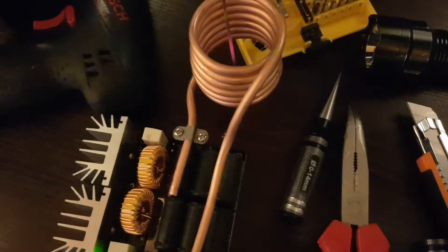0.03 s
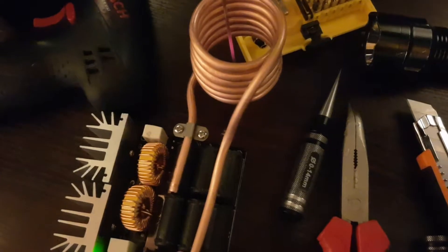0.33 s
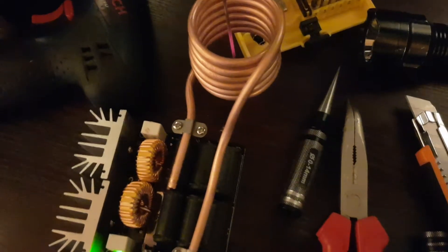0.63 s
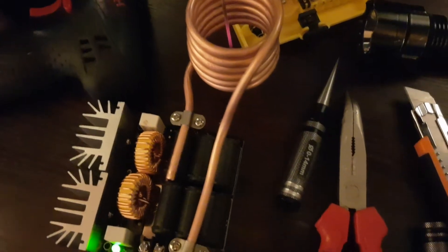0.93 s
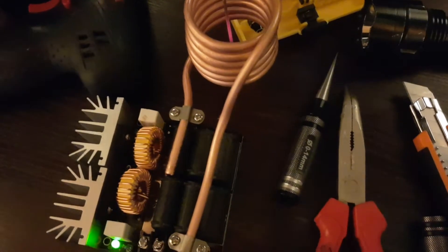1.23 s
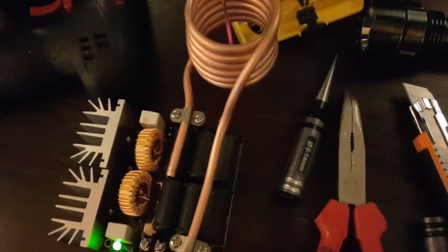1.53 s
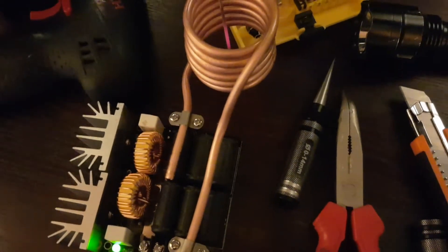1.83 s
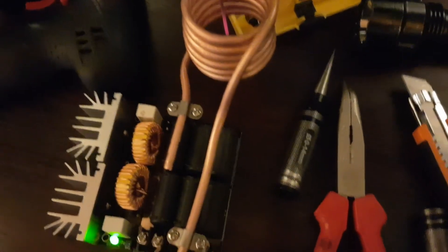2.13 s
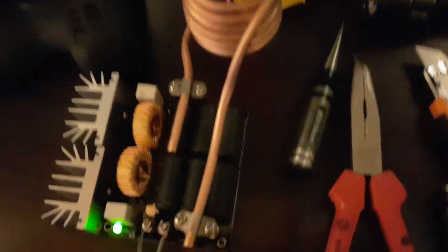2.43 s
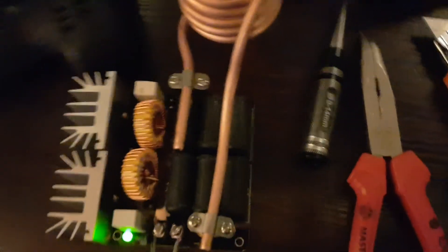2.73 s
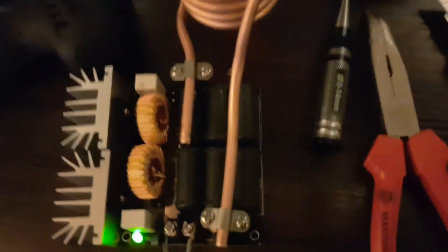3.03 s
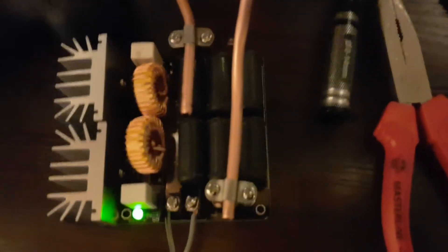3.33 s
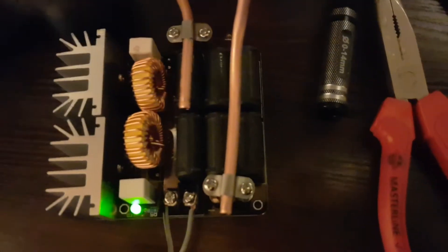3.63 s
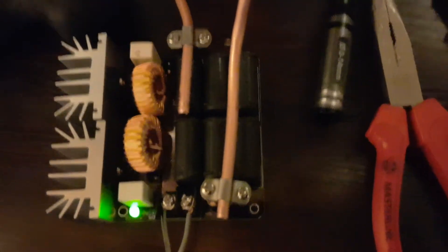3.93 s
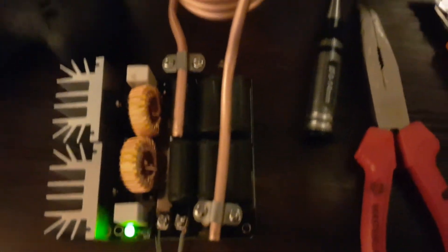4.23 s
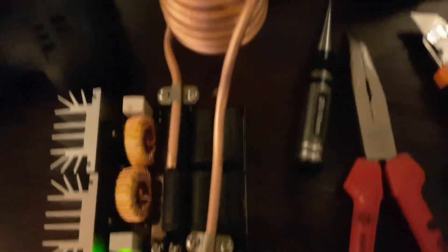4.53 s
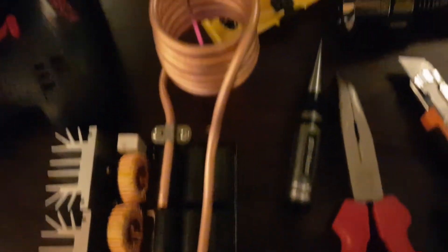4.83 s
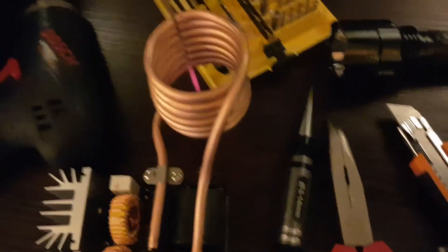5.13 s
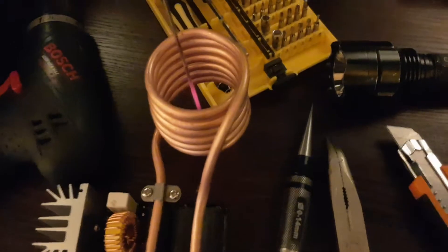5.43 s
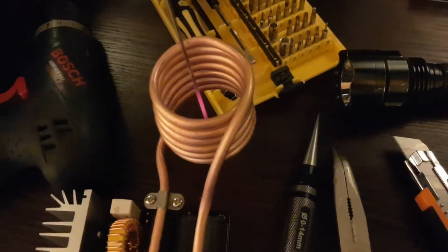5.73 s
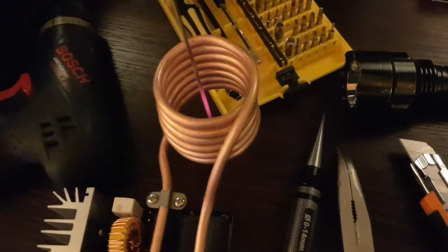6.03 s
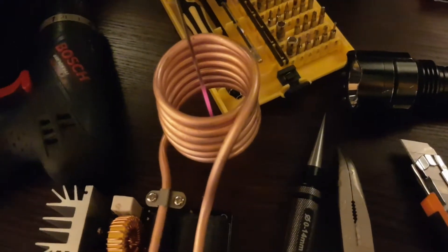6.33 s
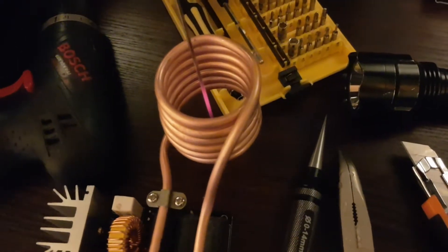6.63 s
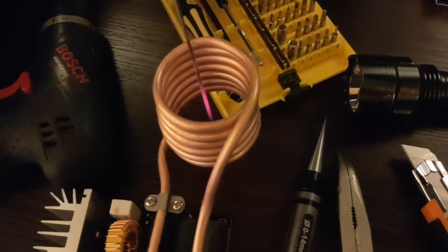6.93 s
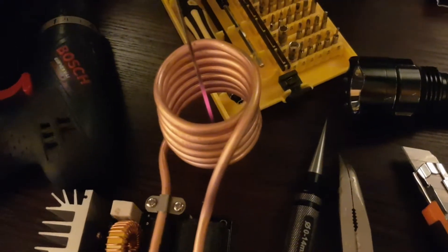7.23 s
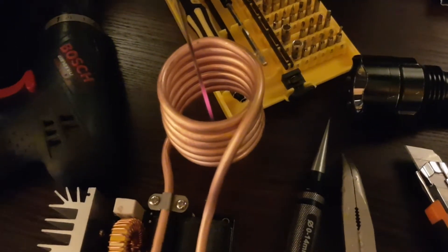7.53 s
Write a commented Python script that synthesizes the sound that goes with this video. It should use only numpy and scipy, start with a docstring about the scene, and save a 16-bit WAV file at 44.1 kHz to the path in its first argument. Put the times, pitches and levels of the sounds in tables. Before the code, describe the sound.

A small electronic device hums low and evenly in a quiet workshop while a hand softly bumps and rubs the camera.

```python
"""The power supply of a small induction heater hums at twice the mains frequency as its core flexes.
In the quiet workshop a hand shifts its grip on the camera: pushes thump through the casing,
stick-slip friction makes dull scuffs and light slides of skin, and the plastic gives tiny ticks.
Under it lie a faint clock, the murmur of the room and the hiss of the microphones."""
import sys
import numpy as np
from scipy import signal
from scipy.fft import rfft, irfft
from scipy.io import wavfile
from scipy.ndimage import uniform_filter1d

SR = 44100
rng = np.random.default_rng(int(sys.argv[2]) if len(sys.argv) > 2 else 0)


def bounce(signal):
    """Save signal as a 16-bit WAV file at the path given by the first command-line argument."""
    frames = np.transpose(np.atleast_2d(signal))
    limited = np.clip(frames, -1, 1)
    pcm = np.round(limited * 32767).astype(np.int16)
    wavfile.write(sys.argv[1], SR, pcm)


N = 343980
T = np.arange(N) / SR
HZ = np.fft.rfftfreq(N, 1 / SR)

# partials of the core: (harmonic number, relative level [dB])
HUM_PARTIALS = [(1, -0.5), (2, -23.5)]
# the camera nears the circuit and draws back: (time [s], gain [dB])
NEARNESS = [(2.0, -12), (2.8, 1.5), (4.2, -1.5), (5.0, -7), (7.8, -15)]
# shifts of the grip: (time [s], thump level [dB], thump frequency [Hz], rebound level [dB],
# scuff level [dB], scuff centre [Hz], jolt level [dB])
GRIP_SHIFTS = [(1.424, -49.5, 90.5, -53.5, -81, 179.5, -70), (1.692, -39, 96, -43.5, -67, 200, -54.5),
               (2.128, -46, 112, -64, -61, 290, -65), (2.349, -47, 94.5, -53, -76, 179, -62.5),
               (2.532, -53, 106, -60, -68, 210, -65), (2.73, -48.5, 108, -56, -57.5, 209, -66),
               (2.951, -26.5, 113.5, -46, -57, 225, -68), (3.226, -30.5, 105.6, -46, -55.5, 190, -58),
               (3.454, -48.5, 102, -46.5, -68, 180, -74), (3.694, -36.5, 103.7, -33, -59, 240, -44.5),
               (3.91, -43, 85, -43, -63, 150, -44.5), (4.215, -36, 116, -44.5, -62, 191, -53),
               (4.326, -49.5, 121, -74, -71, 394, -73), (4.472, -39.5, 109, -52, -64.5, 273, -50.5),
               (4.838, -51, 130, -49.5, -61, 320, -62), (5.24, -41.5, 112, -41.5, -51, 288, -49),
               (5.437, -51, 94, -59, -76, 200, -72), (5.745, -39, 111.6, -61, -69, 200, -67),
               (6.078, -52, 106, -70, -74, 180, -72), (6.607, -39, 116, -47.5, -59, 270, -69),
               (7.095, -42, 109, -51, -69.5, 180, -71), (7.628, -43, 122, -49, -61.5, 161, -55.5)]
# unsteadiness of the hand: (time [s], level [dB])
HAND_TREMOR = [(0, -90), (0.28, -65), (0.55, -83), (2.0, -69.5), (4.3, -68), (6.0, -73.5), (7.8, -79.5)]
# hard pushes: (time [s], knock level [dB], ring level [dB])
HARD_SHOVES = [(3.692, -45, -71.5), (4.815, -45.5, -69), (5.228, -50, -49)]
# skin and sleeve sliding: (time [s], level [dB], length [s], centre [Hz], spread [octaves])
SKIN_SLIDES = [(2.136, -74, 0.099, 4900, 0.57), (2.742, -73.5, 0.125, 4620, 1.4),
               (2.954, -70.5, 0.09, 3600, 1.7), (3.124, -80, 0.26, 8550, 0.39),
               (3.227, -67.5, 0.095, 2610, 1.6), (3.238, -69, 0.054, 3600, 0.12),
               (3.534, -74.5, 0.13, 4700, 1.4), (3.92, -68.5, 0.09, 3360, 1.4),
               (4.18, -77, 0.24, 3800, 2.1), (4.452, -67.5, 0.038, 3050, 0.35),
               (4.507, -58.5, 0.072, 3400, 1.36), (4.535, -59.5, 0.055, 2560, 0.57),
               (4.77, -68.5, 0.16, 4600, 1.5), (4.85, -71, 0.13, 2070, 1),
               (5.141, -70.5, 0.075, 4700, 0.65), (5.262, -65.5, 0.17, 2400, 1.6),
               (5.747, -72, 0.089, 2500, 0.94), (6.088, -79.5, 0.13, 3970, 1.1),
               (6.805, -71, 0.077, 4900, 0.36), (7.124, -71.5, 0.092, 4650, 0.41),
               (7.427, -66, 0.079, 9400, 0.5), (7.431, -66.5, 0.089, 5440, 0.51)]
# small ticks of the casing, and one louder high beat of the clock:
# (time [s], level [dB], frequency [Hz], left minus right [dB])
SMALL_TICKS = [(2.633, -59, 576, 4), (2.745, -53, 2380, -13), (2.774, -53, 2000, -13),
               (3.765, -57, 7800, -7), (3.774, -61, 4550, -12), (4.121, -57, 8550, -9)]
# peaks and dips in the casing's response: (frequency [Hz], width [Hz], gain [dB])
CASING_MODES = [(234, 150, 8.5), (444, 36, -3), (630, 52, 2), (1270, 180, 4), (2110, 500, 1),
                (3580, 3400, 5), (4660, 120, 2.5), (6350, 230, 4.5), (7250, 1100, -4), (8270, 680, 5.5)]
# resonances of a hollow part: (frequency [Hz], width [Hz], gain [dB])
CAVITY_MODES = [(437, 73, 10), (500, 50, 9), (564, 55, 9.5), (730, 30, 3), (851, 23, 17.5), (1900, 130, 15)]
# the clock's two beats: (first time [s], level before nearness gain [dB], frequency [Hz])
CLOCK_BEATS = [(0.2528, -65.5, 3480), (0.772, -61.5, 7640)]
# murmur of the room: (frequency [Hz], relative spectral density [dB])
ROOM_SPECTRUM = [(20, -12.5), (35, -5.5), (42, 2.5), (54, -6), (95, 4), (150, -1), (200, -9), (238, -3.5),
                 (330, -12), (460, -25.5), (580, -15.5), (680, -23), (1100, -32.5), (15000, -61)]
# microphone hiss: (frequency [Hz], relative spectral density [dB])
HISS_SPECTRUM = [(100, 5.5), (1000, 2), (2000, 1), (4000, -0.5), (6500, -3.5), (9000, -3.5), (12500, 1.5),
                 (15500, 1)]
# likeness of left and right: (frequency [Hz], correlation [0 to 1])
COHERENCE = [(20, 0.3), (120, 0.62), (250, 0.81), (500, 0.52), (1000, 0), (16000, 0)]


def transformer_hum(hum_hz=120.005, hum_db=-62.5, waver=0.15, whine_hz=1446, whine_db=-95):
    """Magnetostriction flexes the core twice a mains cycle; the circuit adds a thin whine."""
    drift = slow_drift(4)
    core = sum(gain_of(db) * np.sin(2 * np.pi * (harmonic * hum_hz * T + rng.random()))
               for harmonic, db in HUM_PARTIALS)
    hum = gain_of(hum_db) * core * (1 + waver * drift) * panned(-0.65)
    whine = gain_of(whine_db) * gain_curve(NEARNESS) * np.sin(2 * np.pi * whine_hz * T + drift)
    return np.sqrt(2) * (hum + whine)


def grip_thumps(width_s=0.031, rebound_s=0.051):
    """Transient excitation: a push rocks the casing for a few cycles, as does its release."""
    out, t = np.zeros((2, N)), np.arange(-SR // 10, SR // 10) / SR
    pulse = np.exp(-np.log(2) * (2 * t / width_s) ** 2)
    for s, push_db, hz, rebound_db, *_ in GRIP_SHIFTS:
        for at, db in (s, push_db), (s + rebound_s, rebound_db):
            rocking = np.cos(2 * np.pi * (hz * t + rng.random()))
            add(out, at + t[0], gain_of(db) * pulse * rocking * panned(-0.93))
    return out


def camera_sway(centre_hz=40, lag_s=0.027):
    """Rigid-body motion: tremor and jolts of the hand shake both microphones nearly in phase."""
    shake = noise(octave_band(HZ, centre_hz, octaves=1.64))
    power = gain_curve(HAND_TREMOR) ** 2
    for s, *_, jolt_db in GRIP_SHIFTS:
        power += (gain_of(jolt_db) * swell(T - s - lag_s, rise_s=0.06, fall_s=0.076)) ** 2
    return np.sqrt(power) * evened(shake.mean(0) + 0.2 * shake)


def friction(strokes, modes, pan_db, grain_db, ripple_db, low_share=1, size=24576):
    """Stick-slip friction: many tiny slips drive the resonances of a body."""
    out, hz = np.zeros((2, N)), np.fft.rfftfreq(size, 1 / SR)
    t = (np.arange(size) - size // 3) / SR
    body_db = sum(db * resonance(hz, centre, width) for centre, width, db in modes)
    for s, db, rise_s, fall_s, centre_hz, octaves in strokes:
        slips = rng.standard_normal((2, size))
        slips *= gain_of(grain_db * np.minimum(rng.exponential(1, size), 5))
        # near reflections ripple the spectrum, differently for every place of contact
        ripple = ripple_db * evened(uniform_filter1d(rng.standard_normal(len(hz)), size=90))
        skirt = octaves * np.where(hz < centre_hz, low_share, 1)  # light contact has less bass
        rub = coloured(slips, hz, gain_of(body_db + ripple) * octave_band(hz, centre_hz, skirt))
        envelope = swell(t, rise_s, fall_s)
        stroke = evened(rub * envelope) * np.sqrt(np.mean(envelope ** 2))
        add(out, s + t[0], gain_of(db) * stroke * panned(pan_db))
    return out


def casing_shoves(knock_hz=220, ring_hz=487, lag_s=0.052):
    """Cavity resonance: a dull knock on the casing sets a hollow part ringing."""
    knocks = [(s, db, 0.021, 0.037, knock_hz, 0.66) for s, db, _ in HARD_SHOVES]
    rings = [(s + lag_s, db, 0.048, 0.043, ring_hz, 1.12) for s, _, db in HARD_SHOVES]
    return (friction(knocks, CASING_MODES, pan_db=1.5, grain_db=2.0, ripple_db=0.7)
            + friction(rings, CAVITY_MODES, pan_db=0.5, grain_db=5.0, ripple_db=1.5))


def palm_scuffs(lag_s=0.014, rise_s=0.043, fall_s=0.075, octaves=1.32):
    """Sliding friction: the palm drags dully over the casing with every grip."""
    strokes = [(s + lag_s, db, rise_s, fall_s, hz, octaves) for s, *_, db, hz, _ in GRIP_SHIFTS]
    return friction(strokes, CASING_MODES, pan_db=1.6, grain_db=2.5, ripple_db=0.5)


def skin_slides(rise_share=0.38, fall_share=0.61):
    """Light friction near the right microphone swells quickly and fades more slowly."""
    strokes = [(s, db, rise_share * length, fall_share * length, hz, octaves)
               for s, db, length, hz, octaves in SKIN_SLIDES]
    return friction(strokes, CASING_MODES, pan_db=-4.5, grain_db=2.5, ripple_db=2.16, low_share=0.98)


def ticks(events, ring_cycles=2.9, tail_s=0.01, tail_db=-15, octaves=0.38, size=4096):
    """Damped oscillation: a small part rings briefly, and the bench scatters a faint tail."""
    out, t, hz = np.zeros((2, N)), np.arange(size) / SR, np.fft.rfftfreq(size, 1 / SR)
    attack = 1 - np.exp(-t / 0.0008)
    for s, db, ring_hz, pan_db in events:
        ring = np.sin(2 * np.pi * ring_hz * t) * np.exp(-t * ring_hz / ring_cycles)
        scatter = coloured(rng.standard_normal((2, size)), hz, octave_band(hz, ring_hz, octaves))
        tail = gain_of(tail_db) * scatter * np.exp(-t / tail_s)
        add(out, s, gain_of(db) * (ring + tail) * attack * panned(pan_db))
    return out


def clock(period_s=1, near_share=0.45, pan_db=-6.5):
    """Impulse excitation: a clock rings low and high in turn, louder as the camera moves in."""
    beats = [(s, db + near_share * np.interp(s, *np.transpose(NEARNESS)), hz, pan_db)
             for first, db, hz in CLOCK_BEATS for s in np.arange(first, N / SR, period_s)]
    return ticks(beats, ring_cycles=8.3, tail_s=0.02, tail_db=-10, octaves=0.24)


def room_murmur(murmur_db=-67, drone_db=-89.5):
    """Random pressure fluctuations: a low murmur, with one narrow band heard as a fuzzy note."""
    murmur = gain_of(murmur_db) * noise(gain_of(spectrum_at(ROOM_SPECTRUM, HZ)))
    band = noise(resonance(HZ, centre_hz=555, width_hz=22))
    drone = gain_of(drone_db + 0.5 * slow_drift(0.9)) * band
    return murmur * panned(-1.7) + drone


def microphone_hiss(db=-72.5):
    """Self-noise of the microphones forms an even broadband floor."""
    return gain_of(db) * noise(gain_of(spectrum_at(HISS_SPECTRUM, HZ)))


def gain_of(db):
    """Amplitude ratio of a level in decibels."""
    return 10 ** (np.asarray(db) / 20)


def gain_curve(points):
    """Amplitude envelope, interpolated in decibels."""
    return gain_of(np.interp(T, *np.transpose(points)))


def evened(x):
    """Normalisation to unit rms."""
    return x / np.sqrt(np.mean(x ** 2) + 1e-30)


def spectrum_at(points, hz):
    """Interpolation on a log-frequency axis."""
    point_hz, value = np.transpose(points)
    return np.interp(np.log(hz + 1), np.log(point_hz + 1), value)


def octave_band(hz, centre_hz, octaves):
    """Gaussian passband in log frequency."""
    return np.exp(-(np.log2((hz + 1) / centre_hz) / octaves) ** 2)


def resonance(hz, centre_hz, width_hz):
    """Lorentzian peak of unit height."""
    return 1 / (1 + (2 * (hz - centre_hz) / width_hz) ** 2)


def swell(t, rise_s, fall_s):
    """Gaussian rise to time zero, then exponential decay."""
    return np.where(t < 0, np.exp(-(t / rise_s) ** 2), np.exp(-abs(t) / fall_s))


def panned(pan_db):
    """Stereo gains for a level difference, left minus right."""
    return gain_of(np.array([[pan_db], [-pan_db]]) / 2)


def add(mix, s, sound):
    """Superposition of a stereo sound at time s."""
    part = mix[:, max(round(s * SR), 0):][:, :sound.shape[1]]
    part += sound[:, :part.shape[1]]


def coloured(drive, hz, gain):
    """Partial coherence: two noises are filtered, and long waves reach both microphones more alike."""
    left, independent = rfft(drive)
    likeness = np.clip(spectrum_at(COHERENCE, hz), -1, 1)
    right = likeness * left + np.sqrt(1 - likeness ** 2) * independent
    return evened(irfft(np.array([left, right]) * gain, drive.shape[1]))


def noise(gain):
    """Stationary stereo noise of a given spectrum."""
    return coloured(rng.standard_normal((2, N)), HZ, gain)


def slow_drift(cutoff_hz):
    """Random modulation: low-pass noise of unit rms."""
    return evened(irfft(rfft(rng.standard_normal(N)) * np.exp(-HZ / cutoff_hz), N))


def scene():
    """Superposition of the hum, the handling of the camera and the background."""
    hum = transformer_hum()
    handling = grip_thumps() + camera_sway() + casing_shoves() + palm_scuffs() + skin_slides()
    return hum + handling + ticks(SMALL_TICKS) + clock() + room_murmur() + microphone_hiss()


def record(dry):
    """Band limiting: a low-pass filter removes the highest treble."""
    low_pass = signal.firwin(511, cutoff=15870, window=("kaiser", 9), fs=SR)
    return signal.oaconvolve(dry, low_pass[None], "same")


dry = scene()
out = record(dry)
bounce(out)
```